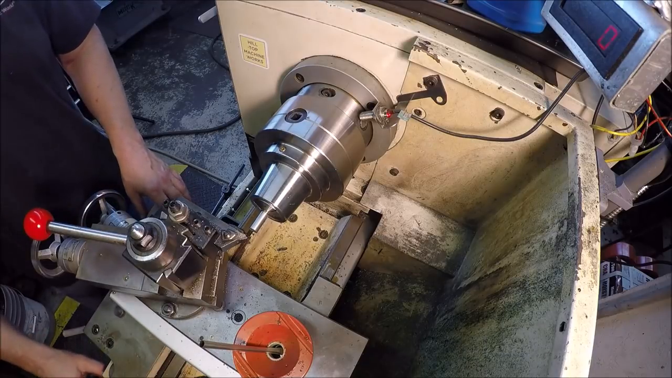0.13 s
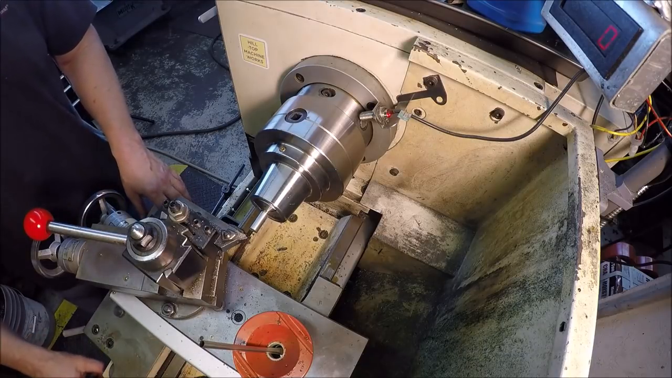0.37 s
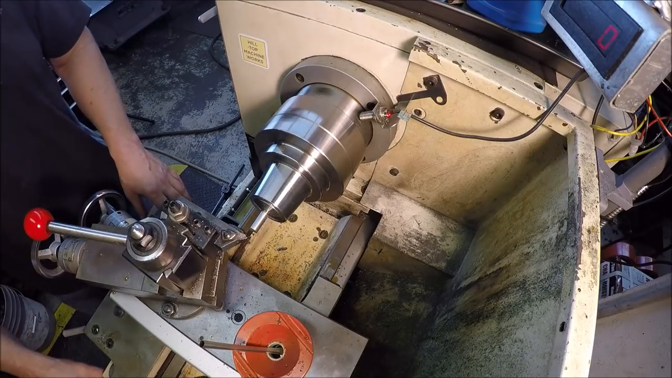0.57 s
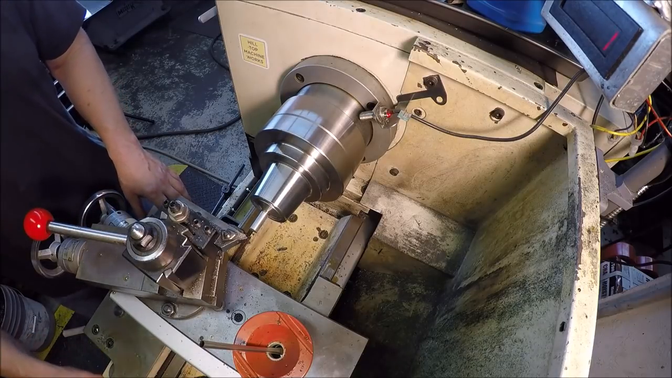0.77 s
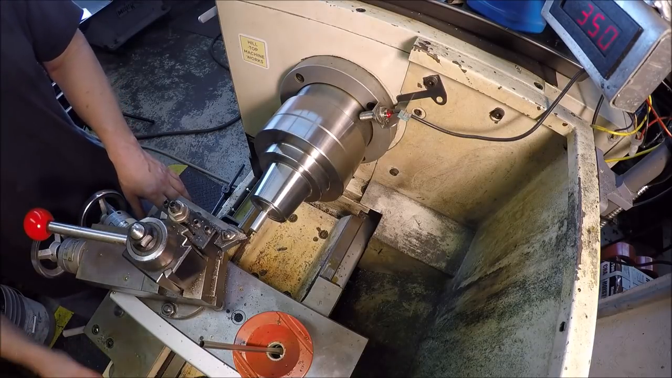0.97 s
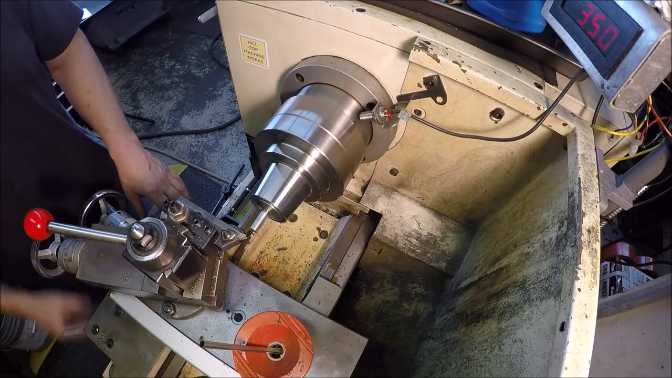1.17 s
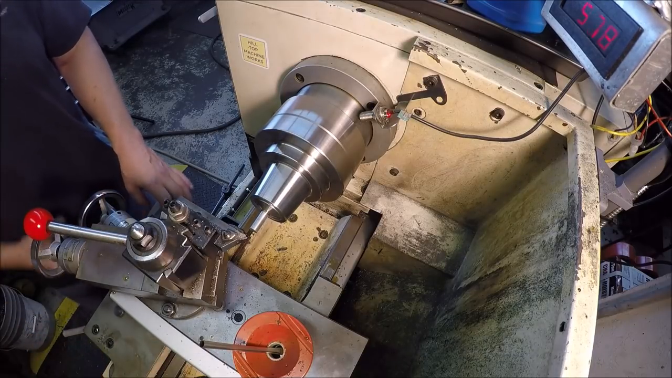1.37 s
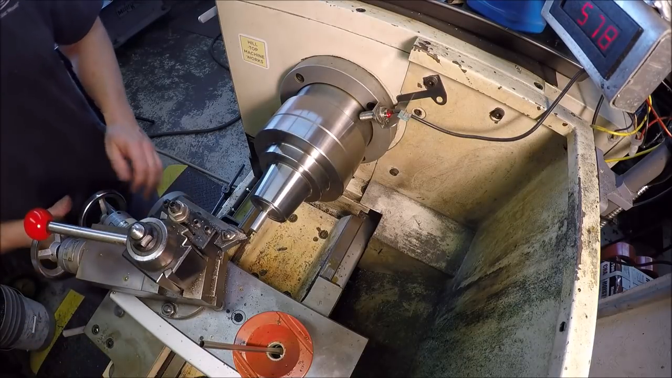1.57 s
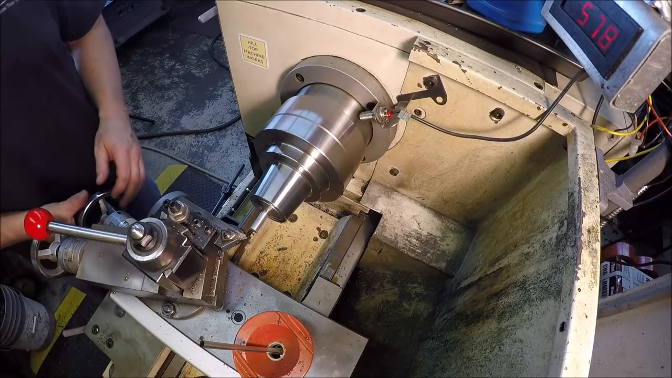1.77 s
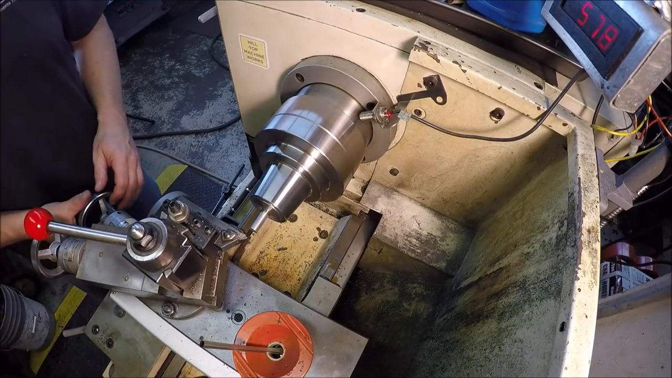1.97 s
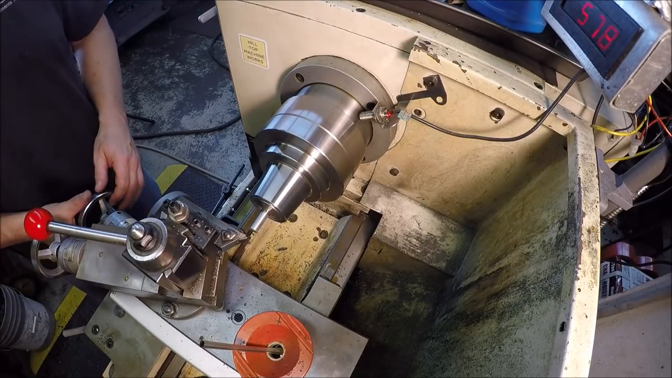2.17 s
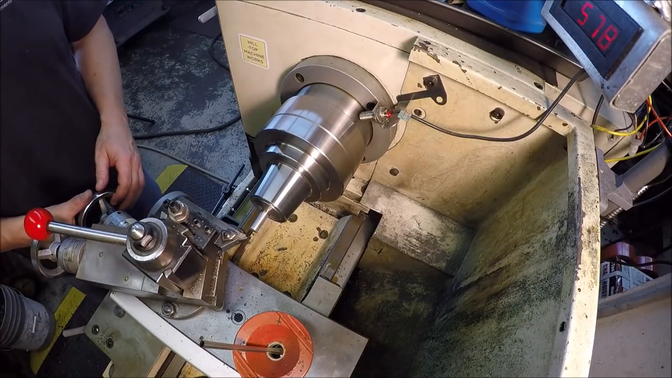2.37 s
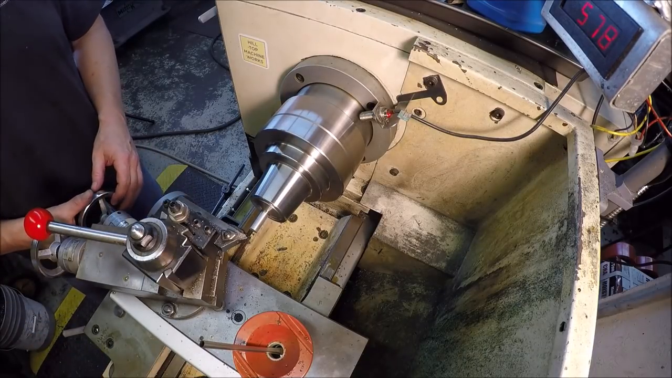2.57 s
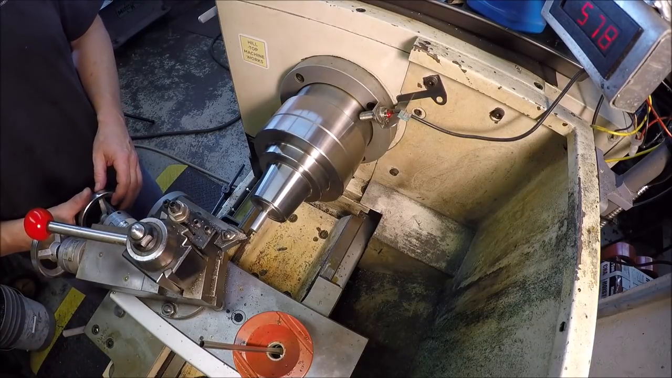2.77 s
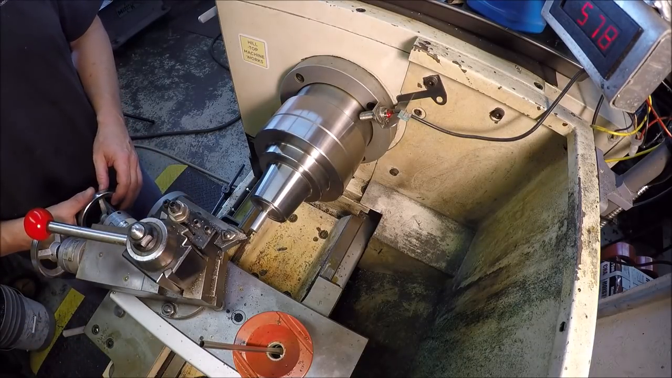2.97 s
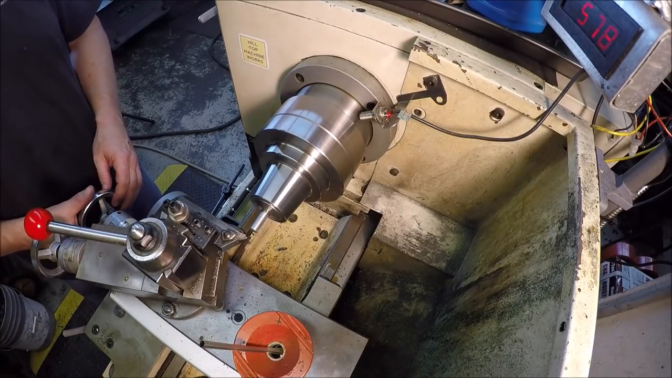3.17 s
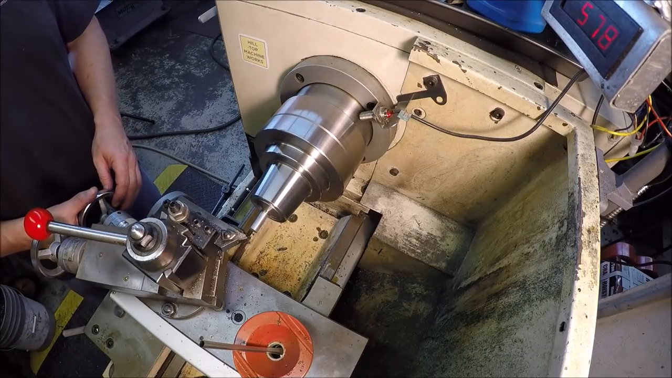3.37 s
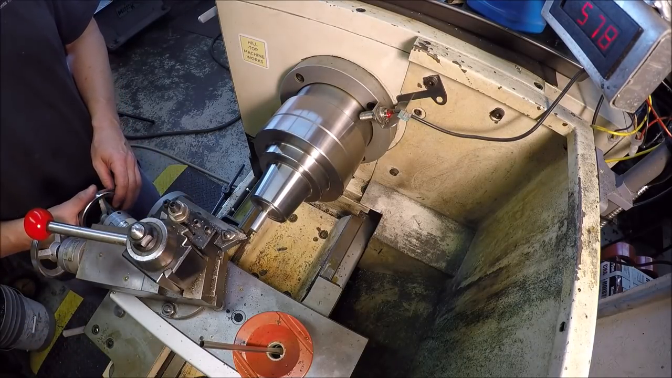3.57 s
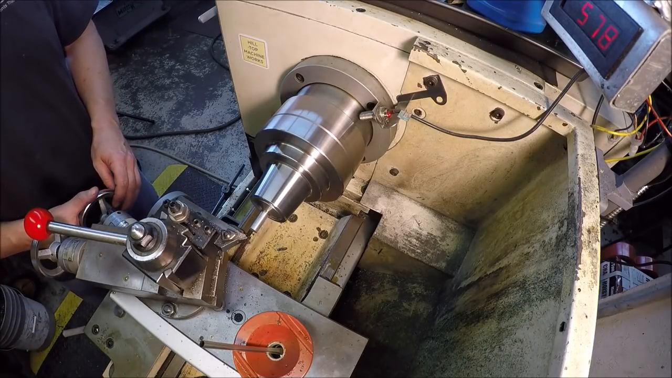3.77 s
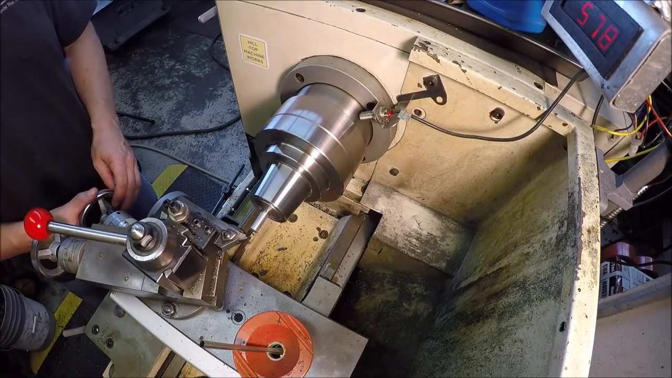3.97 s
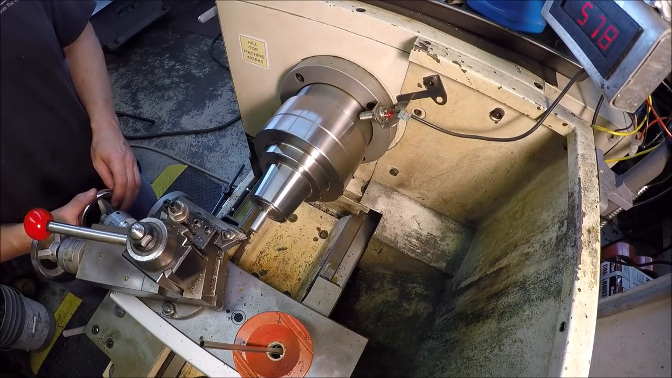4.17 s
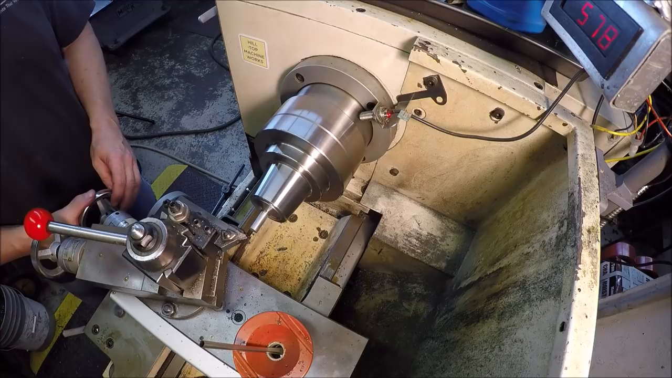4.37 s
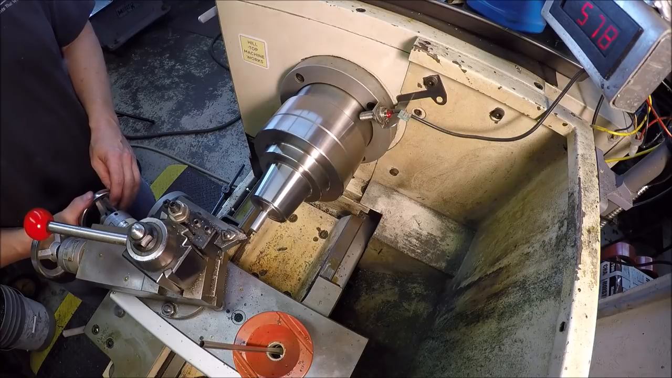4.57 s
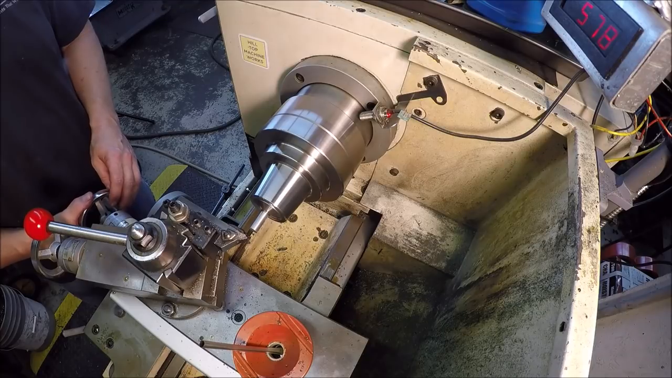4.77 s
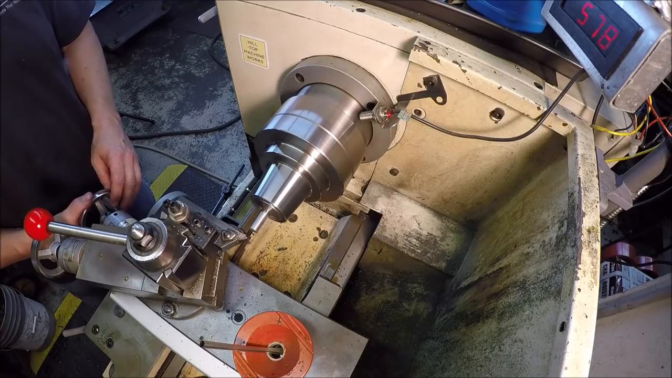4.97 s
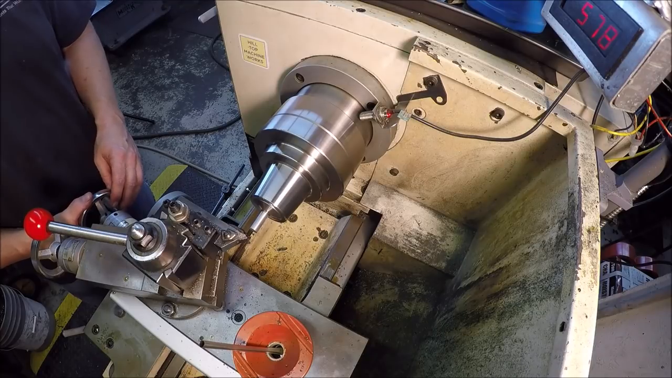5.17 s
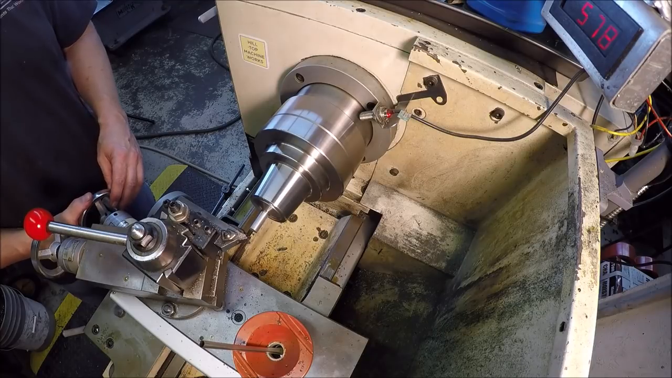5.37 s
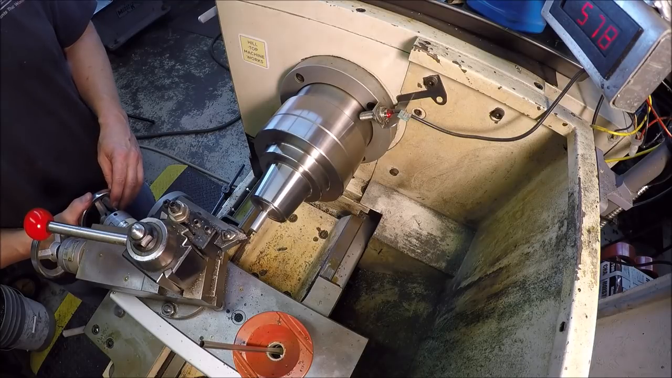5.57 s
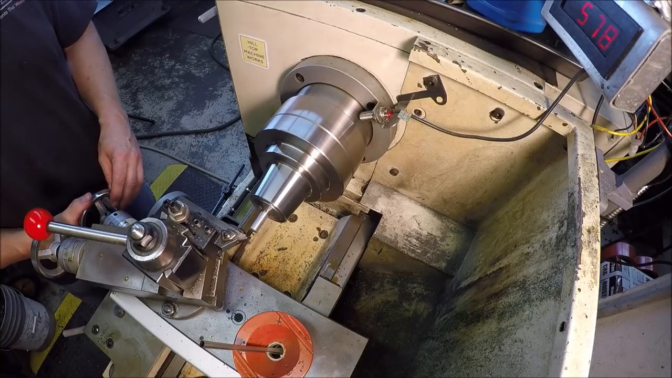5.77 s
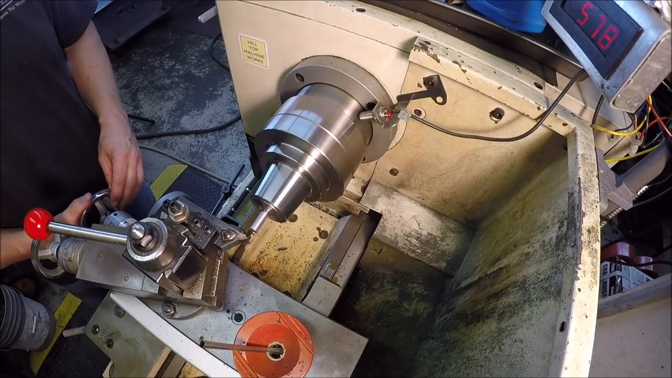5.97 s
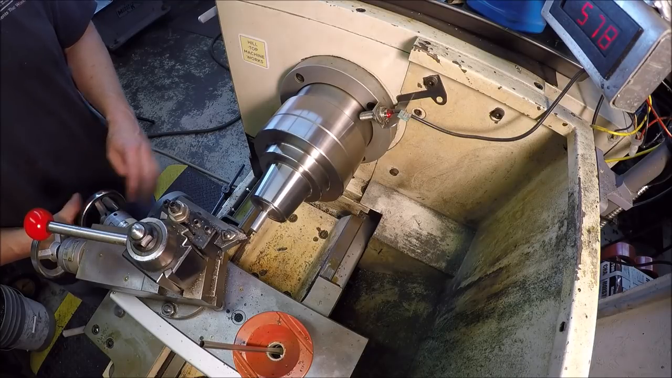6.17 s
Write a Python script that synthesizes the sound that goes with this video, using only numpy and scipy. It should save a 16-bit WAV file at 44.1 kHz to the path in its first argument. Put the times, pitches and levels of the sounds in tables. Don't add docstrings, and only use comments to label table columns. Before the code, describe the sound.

A belt-driven lathe clicks on, jolts and growls up to speed almost at once, then whirs evenly with mains hum and a rough metallic rush.

```python
import sys
import numpy as np
from scipy import signal
from scipy.fft import rfft, irfft, next_fast_len
from scipy.io import wavfile
from scipy.ndimage import uniform_filter1d, map_coordinates

SR = 44100
rng = np.random.default_rng(int(sys.argv[2]) if len(sys.argv) > 2 else 0)


def natural_amplitude(level_db):
    exponent = np.asarray(level_db, float) / 20
    return 10 ** exponent


def file_out(sig):
    cols = np.atleast_2d(sig).T
    lim = np.clip(cols, -1, 1)
    pcm = np.round(lim * 32767).astype(np.int16)
    wavfile.write(sys.argv[1], SR, pcm)


N = 274743
T = np.arange(N) / SR
MAINS_HZ, MOTOR_HZ, BELT_HZ, SPINDLE_HZ, TEETH_HZ = 120.01, 29.84, 6.684, 9.614, 162.17


def unit(x):
    return x / np.sqrt(np.mean(x ** 2) + 1e-20)


def along(points, hz):
    f, v = np.transpose(points)
    return np.interp(np.log(hz + 1), np.log(f + 1), v)


def curves(rows):
    s, *cols = np.transpose(rows)
    return [np.interp(T, s, c) for c in cols]


def wobble(rate):
    coarse = T[::64]
    knots = rng.standard_normal(int(N * rate / SR) + 4)
    return np.interp(T, coarse, map_coordinates(knots, [coarse * rate]))


def filtered(x, response):
    m = next_fast_len(len(x) + 8192)
    return irfft(rfft(x, m) * response(np.fft.rfftfreq(m, 1 / SR)), m)[:len(x)]


def tones(cycles, db, unsteady_db):
    total = 0
    for c, d in zip(cycles, db):
        level = natural_amplitude(d + unsteady_db * wobble(2.99)) * np.sqrt(2)
        total = total + level * np.sin(2 * np.pi * (c + rng.random()))
    return total


# freq_hz, density_db
SHOP_SPECTRUM = [(12, -26), (20, -5), (31, -3), (42, -7), (60, -12), (92, -17), (150, -13.5), (245, -17),
                 (298, -22.5), (400, -21), (491, -24.5), (1230, -29.5), (2250, -33.5), (2550, -40.5),
                 (15500, -64)]


def shop():
    low = lambda hz: 1 / (1 + (hz / 300) ** 6)
    rumble = filtered(rng.standard_normal(N), lambda hz: natural_amplitude(along(SHOP_SPECTRUM, hz)) * np.sqrt(low(hz)))
    air = filtered(rng.standard_normal(N), lambda hz: natural_amplitude(along(SHOP_SPECTRUM, hz)) * np.sqrt(1 - low(hz)))
    air_db = -49.5 + 3.5 * np.exp(-T / 0.06)
    far_hum = tones([MAINS_HZ * T], [-50], unsteady_db=4.0)
    ducked = natural_amplitude(-6 * np.clip((T - .6) / .1, 0, 1))
    return ducked * (natural_amplitude(-41.5) * unit(rumble) + natural_amplitude(air_db) * unit(air) + far_hum)


# start_s, level_db, ring_hz
SWITCH_TICKS = [
    (0.573, -43, 4040),
    (0.578, -28, 7340),
    (.5903, -24, 8400),
    (.683, -44, 9500),
    (.729, -37, 7000),
    (.741, -28, 4470),
]


def switch():
    out, t = np.zeros(N), T[:SR // 2]
    for s, db, hz in SWITCH_TICKS:
        click = unit(filtered(rng.standard_normal(len(t)), lambda f: 1 / (1 + (f / 9000) ** 2.7)))
        ring = 0.33 * np.sin(2 * np.pi * hz * t)
        out[round(s * SR):][:len(t)] += natural_amplitude(db - 8.5 - 60 * t / 0.064) * (click + ring)
    return out


# mains_multiple, level_db
HUM_TONES = [(1, -28.1), (2, -53), (3, -56), (4, -55)]
# belt_multiple, level_db
BELT_SIDE_TONES = [(-2, -55.5), (1, -55), (2, -46.7), (3, -47.2), (4, -49.8), (5, -48), (6, -55.5),
                   (7, -49.7)]
# motor_multiple, mains_multiple, level_db
ROTOR_TONES = [(1, 0, -46), (1, 1, -48), (34, 0, -42.7), (34, 1, -52), (33, 1, -50), (34, 2, -47),
               (34, 4, -52), (68, 0, -53)]


def hum(turned, pull_db):
    pure = tones([k * MAINS_HZ * T for k, _ in HUM_TONES], [d for _, d in HUM_TONES], unsteady_db=0.0)
    sides = [(MAINS_HZ * T + k * BELT_HZ * turned, d) for k, d in BELT_SIDE_TONES]
    sides += [(m * MAINS_HZ * T + k * MOTOR_HZ * turned, d) for k, m, d in ROTOR_TONES]
    return natural_amplitude(pull_db) * (pure + tones(*zip(*sides), unsteady_db=-0.9))


# turning_multiple, level_db
BELT_TONES = [(3, -56), (4, -41.6), (5, -43.5), (6, -52), (7, -38.3), (12, -61), (14, -59)]
# turning_multiple, level_db
SPINDLE_TONES = [(1, -53), (32, -54), (39, -56), (40, -37), (41, -52), (45, -54), (48, -53), (59, -36),
                 (60, -43), (66, -51), (80, -55)]
# meshing_multiple, level_db
TEETH_TONES = [(4, -43.6), (5, -52), (6, -45), (8, -50.5), (9, -55.5), (12, -58), (14, -53), (16, -56.5),
               (17, -59), (21, -58)]
# freq_hz, level_db
PART_TONES = [(315, -53), (678.5, -38), (1368, -48.6), (1750.3, -51), (1975.8, -56), (3051.5, -52),
              (3171.4, -58), (3346, -57)]


def shafts(turned):
    rows = []
    for hz, table in ((BELT_HZ, BELT_TONES), (SPINDLE_HZ, SPINDLE_TONES), (TEETH_HZ, TEETH_TONES), (1, PART_TONES)):
        rows += [(k * hz * turned, d) for k, d in table]
    return tones(*zip(*rows), unsteady_db=0.5)


# freq_hz, width_hz, lift_db
CASTING_MODES = [(151, 53, 12), (185, 29, 7), (255, 32, 9.5), (304, 18, 10.5), (389, 18, 12.5),
                 (472, 31, 8.5), (552, 35, 12), (640, 35, 4.5), (684, 17, 8), (993, 62, 9.5),
                 (1062, 39, 4.5), (1155, 53, 5.5), (1297, 40, 9), (1385, 30, 7), (1506, 130, 5),
                 (1710, 76, 3), (1856, 32, 7.5), (2060, 52, 2.5), (2254, 96, 6.5), (2682, 20, 11),
                 (2786, 18, 7.5), (3254, 240, 3.5), (3425, 54, 8), (3890, 89, 6), (4295, 19, 10.5),
                 (4490, 74, 9.5)]


def casting(hz):
    lift = sum(natural_amplitude(db) ** 2 / (1 + (2 * (hz - c) / w) ** 2) for c, w, db in CASTING_MODES)
    return np.sqrt(1 + lift)


# freq_hz, density_db
RUSH_SPECTRUM = [(12, -44), (20, -30), (62, -23), (105, -18.5), (207, -20.5), (382, -15.5), (800, -10),
                 (1010, -9), (1900, -12), (2760, -15), (5690, -33), (6900, -41), (7520, -47.5),
                 (15500, -64.5)]


def rolling_colour(hz):
    return natural_amplitude(along(RUSH_SPECTRUM, hz)) * casting(hz)


def rolling_rush(throb_db):
    z = signal.stft(rng.standard_normal(N), nperseg=512)[2]
    patches = uniform_filter1d(rng.standard_normal(z.shape), size=7, axis=0)
    patches = uniform_filter1d(patches, size=8, axis=1)
    noise = signal.istft(z * natural_amplitude(unit(patches)), nperseg=512)[1][:N]
    return unit(filtered(noise * natural_amplitude(0.077 * throb_db), rolling_colour))


# start_s, peak_db
BURSTS = [(1.1607, -41), (1.6526, -36), (1.7868, -42), (1.8826, -47.5), (2.0996, -46), (2.58, -45),
          (2.6653, -43), (2.8833, -37), (3.5114, -47), (3.6591, -29), (3.8611, -48.5), (3.9419, -39),
          (4.6997, -40), (5.0404, -55), (5.5318, -46), (5.7393, -43)]


def bunching():
    s, db = np.transpose(BURSTS)
    coarse = T[::64]
    age = np.maximum(coarse - s[:, None], 0)
    shape = np.exp(-age / 0.015) * (1 - np.exp(-age / 0.0048))
    return np.interp(T, coarse, (db + 49) @ shape)


# freq_hz, width_hz, level_db
RACE_MODES = [(5244, 90, -20), (6258, 34, 3), (6480, 30, -9), (9200, 42, -16.5), (10306, 36, -17.5),
              (10789, 32, -18), (13270, 80, -38), (14260, 36, -29), (15223, 45, -35)]


def ball_rattle(turn, throb_db):
    chatter = rng.standard_normal(N) * natural_amplitude(throb_db + 3.2 * np.minimum(rng.exponential(size=N), 7.5))
    beat = natural_amplitude(1.6 * np.sin(turn) + 2.2 * np.sin(2 * turn))
    rings = 0
    for c, w, db in RACE_MODES:
        strikes = chatter * beat * natural_amplitude(2.5 * wobble(22))
        rings = rings + natural_amplitude(db) * filtered(strikes, lambda f: 1j * f * w / (c * c - f * f + 1j * f * w))
    treble = lambda hz: rolling_colour(hz) * hz ** 2 / (hz ** 2 + 5000 ** 2)
    fizz = unit(filtered(chatter * natural_amplitude(-.6 * throb_db), treble))
    singing = np.clip((T - .705) / .012, 0, 1)
    lift_db = bunching()
    return natural_amplitude(-63.5) * (singing * natural_amplitude(17.0 + lift_db) * unit(rings) + natural_amplitude(19 + .4 * lift_db) * fizz)


def bearings(turned):
    turn = 2 * np.pi * SPINDLE_HZ * turned
    throb_db = 0.2 * np.sin(turn) + 1.7 * np.sin(2 * turn + 3.2) + 0.77 * wobble(6.9) + 1.0 * wobble(35)
    return natural_amplitude(-25.5) * rolling_rush(throb_db) + ball_rattle(turn, throb_db)


# freq_hz, density_db
SCRAPE_SPECTRUM = [(59, -40), (100, 0), (177, -3), (270, -3), (362, -17), (467, -5.5), (998, -6),
                   (1210, -6.5), (1660, -6), (6000, -25), (15500, -59)]
# start_s, scrape_db, brightness_hz, thud_hz, thud_db
JOLTS = [(.597, -22, 3000, 67, -28), (0.6053, -11.5, 3241, 1910, -23), (0.6254, -15, 3241, 1320, -24),
         (0.6432, -10.5, 4000, 468, -18), (.655, -12, 2500, 647, -19), (.668, -17, 2000, 1880, -22),
         (.686, -31, 700, 532, -14), (0.682, -28, 500, 49, -10), (.695, -14, 900, 1020, -13.5),
         (.706, -19.5, 1100, 856, -17), (.718, -18.5, 1500, 544, -16.5), (.736, -15.5, 12000, 730, -23),
         (0.749, -23, 500, 40.3, -17), (.775, -24, 1600, 214.6, -23.5)]


def belt_jolts():
    out, t = np.zeros(N), T[:SR // 2]
    for s, db, bright_hz, hz, thud_db in JOLTS:
        dull = 1 / (1 + (bright_hz / 1200) ** 4)
        rise_s = 0.0022 + dull * (0.0097 - 0.0022)
        scrape_t60 = 0.084 + dull * (0.31 - 0.084)
        colour = lambda f: natural_amplitude(along(SCRAPE_SPECTRUM, f)) / np.sqrt(1 + (f / (3 * bright_hz)) ** 2)
        scrape = unit(filtered(rng.standard_normal(len(t)), colour))
        scrape *= natural_amplitude(db - 60 * t / scrape_t60) * (1 - np.exp(-t / rise_s))
        thud_t60 = 0.37 / (1 + (hz / 850) ** 2)
        thud = natural_amplitude(thud_db - 60 * t / thud_t60) * np.sin(2 * np.pi * hz * t) * (1 - np.exp(-t * hz / 2.6))
        out[round(s * SR):][:len(t)] += scrape + thud
    return out


# centre_s, level_db, half_length_s
SURGES = [
    (0.618, -20.5, 0.016),
    (.643, -31, .01),
    (0.747, -18.5, 0.014),
]


def growl():
    slip = np.exp(-np.maximum(T - .622, 0) / 0.0281)
    cycles = np.cumsum(MAINS_HZ + (259.6 - MAINS_HZ) * slip) / SR
    surges = sum(natural_amplitude(db) * np.exp(-((T - s) / half) ** 2) for s, db, half in SURGES)
    return surges * tones([cycles], [0], unsteady_db=0.0)


# time_s, load_db, magnetic_pull_db
DRIVE = [
    (.59, -6, -40),
    (.62, 1, -7),
    (.67, -1, -3),
    (.76, 1, -1),
    (.83, .5, -3),
    (.9, .5, 1.5),
    (1.2, 0.5, 0),
]


def scene():
    load_db, pull_db = curves(DRIVE)
    running = np.maximum(T - .59, 0)
    turned = np.cumsum(1 - (1 - .3) * np.exp(-running / .04)) / SR
    on = np.clip(running / 0.0072, 0, 1)
    lathe = on * (hum(turned, pull_db) + natural_amplitude(load_db) * (shafts(turned) + bearings(turned)))
    return (shop() + switch() + lathe + belt_jolts() + growl())[None]


def low_pass(x):
    return signal.sosfilt(signal.butter(12, 15980, fs=SR, output="sos"), x)


def record(dry):
    fade_out = np.clip((T[-1] - T) * 400, 0, 1)
    x = filtered(dry[0] * fade_out, lambda hz: hz < 15290)
    x = x / (1 + np.abs(x / 2.0) ** 3) ** (1 / 3)
    return low_pass(x[None])


dry = scene()
out = record(dry)
file_out(out)
```